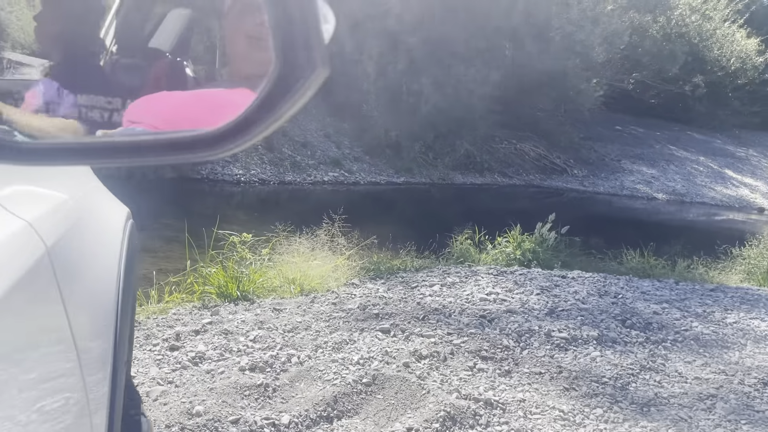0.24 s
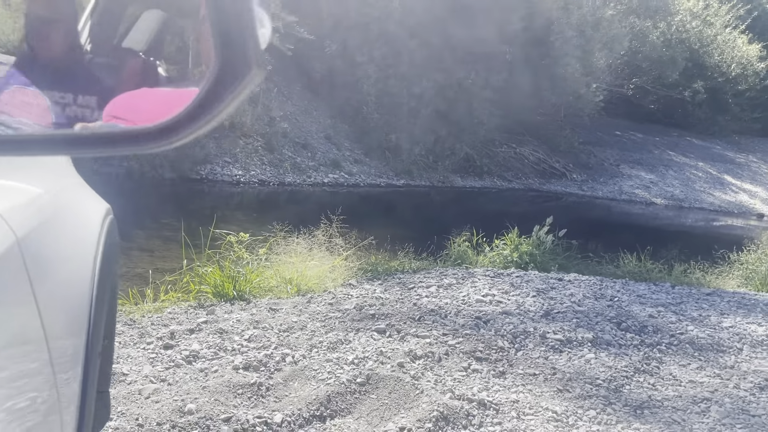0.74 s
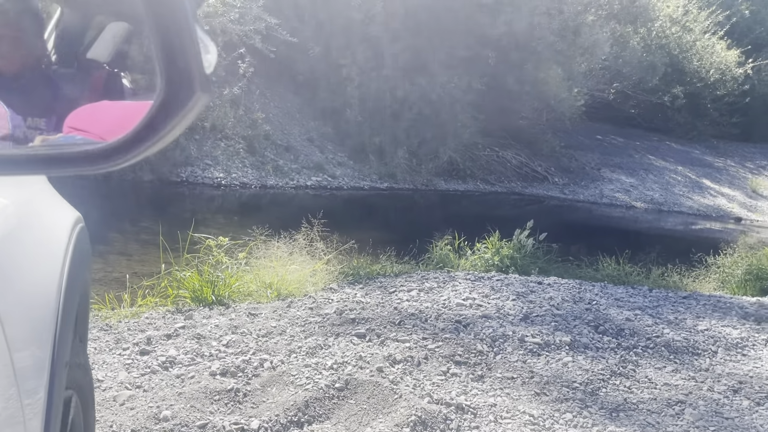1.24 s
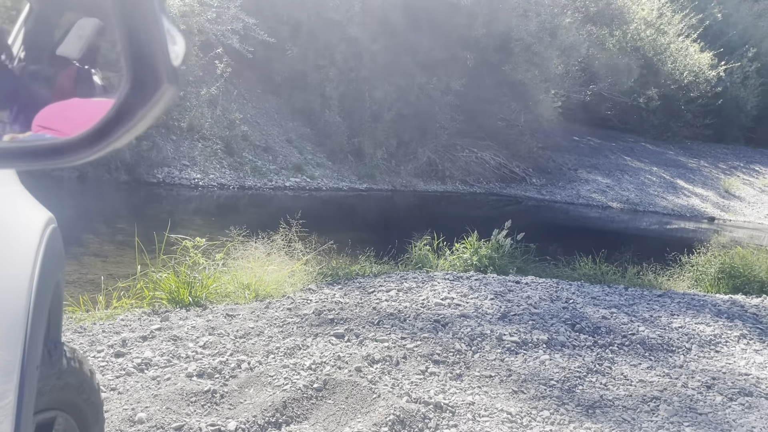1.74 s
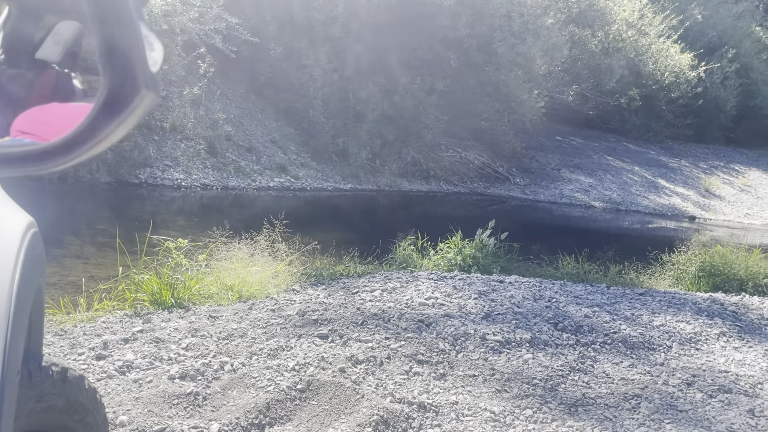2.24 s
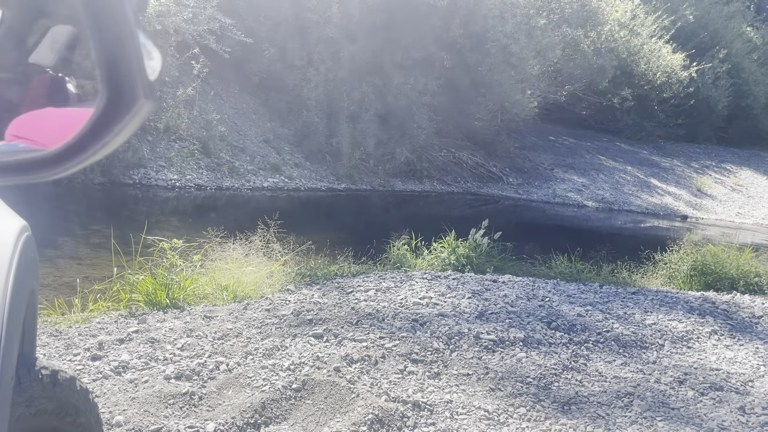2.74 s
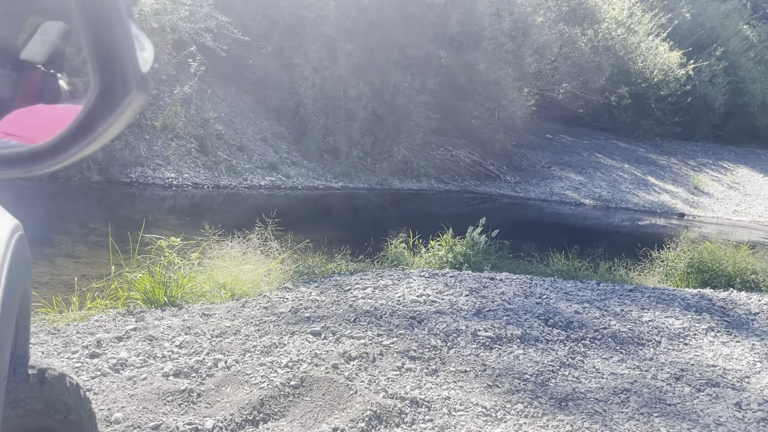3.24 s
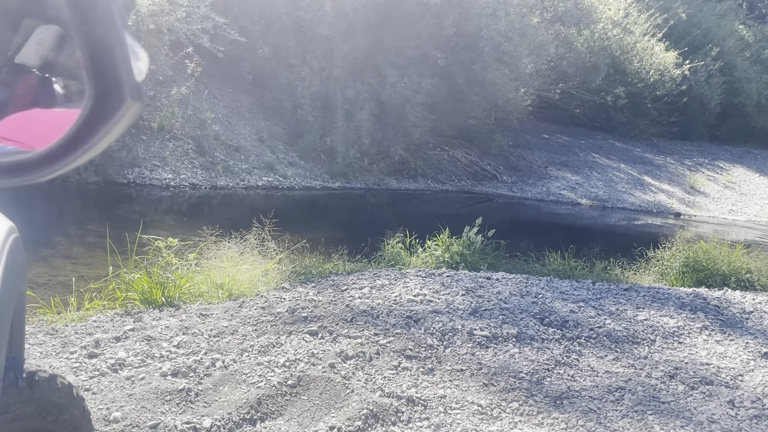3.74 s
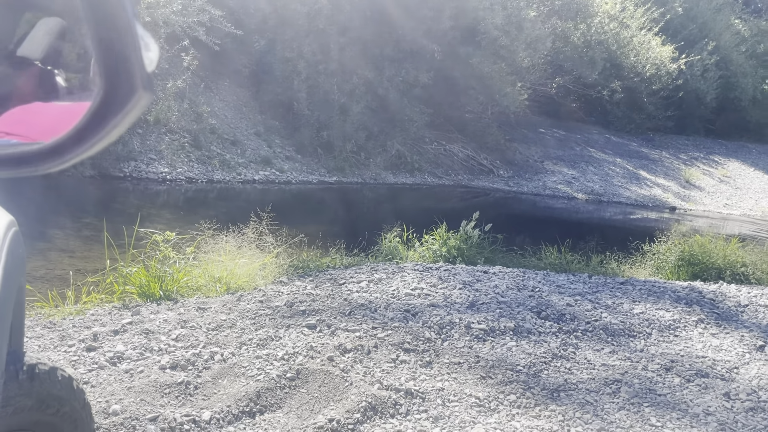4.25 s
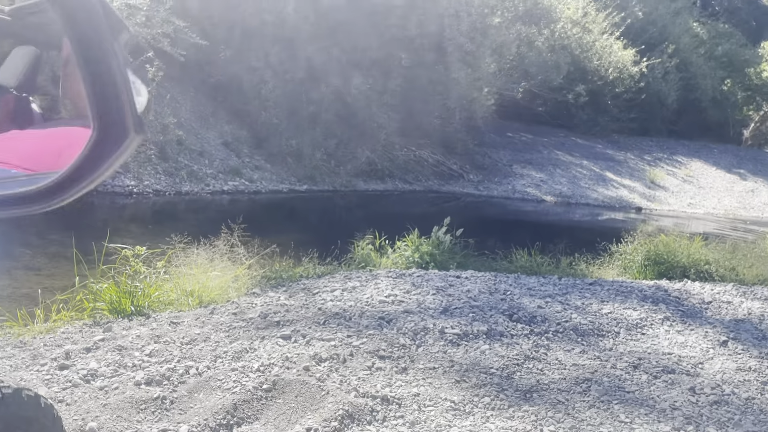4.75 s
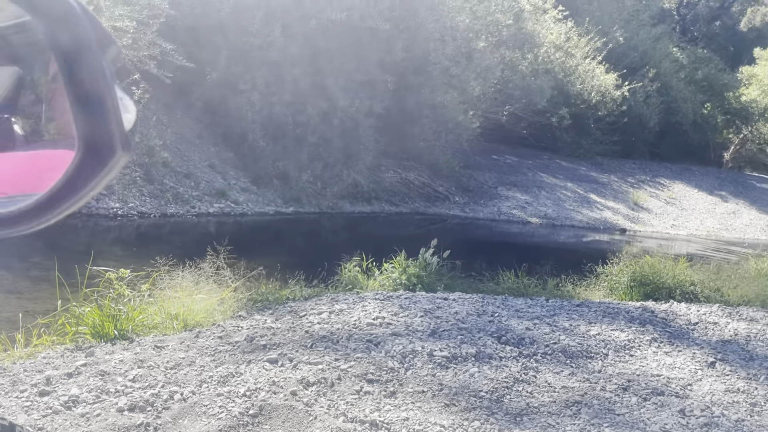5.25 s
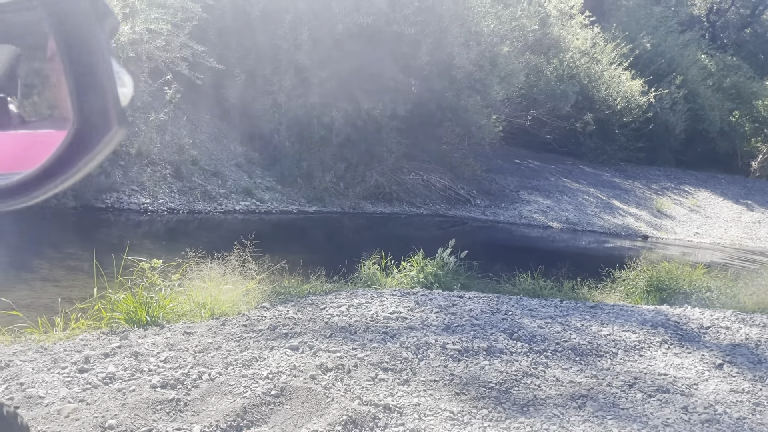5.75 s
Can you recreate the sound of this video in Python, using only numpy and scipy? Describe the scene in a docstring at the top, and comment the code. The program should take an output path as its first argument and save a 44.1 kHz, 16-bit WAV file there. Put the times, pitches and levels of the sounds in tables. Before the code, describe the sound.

A vehicle creeps over a riverside gravel bank. Strong crunch and popping stones open, with a brief piercing squeal; then uneven grinding, clacking pebbles, gritty spitting and soft low thumps. Around three seconds it calms to a low engine hum and sparse ticks. The engine lifts, dips, then surges with a fresh burst of gravel. Close stereo, dry outdoor sound with no echo.

```python
"""Gravel grinds and pops under tyres and a brake squeals over a low engine, close by, at a car's side window.
The car creeps over a bank of loose river gravel: random clicks through colour filters make the stones,
rumbling noise makes the body on the bumps, and decaying rings make the stones that pop.
The engine, harmonics of its firing rate, swells twice; on the second push the tyres churn the gravel.
Two microphone ports hear each sound out of step and at unequal level."""
import sys
import numpy as np
from scipy import signal
from scipy.fft import rfft, irfft
from scipy.io import wavfile
from scipy.ndimage import uniform_filter1d

SR = 44100
rng = np.random.default_rng(int(sys.argv[2]) if len(sys.argv) > 2 else 0)


def digitize_waveform(pressure):
    """Quantize a signal to 16-bit integers and store it at the path in sys.argv[1].

    Rows of a 2-D input are taken as channels; values are limited to [-1, 1].
    """
    field = np.atleast_2d(pressure).T
    bounded = np.clip(field, -1, 1)
    quanta = np.round(bounded * 32767).astype(np.int16)
    wavfile.write(sys.argv[1], SR, quanta)


N = 264600
TIME = np.arange(N) / SR  # s
HZ = np.fft.rfftfreq(N, 1 / SR)

# In every table, levels are relative: each source adds its own trim.
# resonances of exhaust pipe and body panels [f/Hz, level/dB]
EXHAUST_RESONANCE = [(33, -44), (46, -9), (62, -1.5), (77, -1.5), (92, -10), (110, -14.5), (142, -4),
                     (165, -12), (190, -15), (240, -13.5), (275, -20), (305, -17.5), (335, -26), (366, -12),
                     (410, -22), (470, -19), (540, -32), (600, -23), (900, -38)]
# strength of the engine's harmonics [multiple of the firing rate, level/dB]
HARMONICS = [(1, 0.5), (2, 1), (3, -2.5), (4, 0), (5, 1), (6, -4.5), (7, -5), (8, -5.5), (9, 2.5), (10, 2),
             (11, -4.5), (12, -5), (13, -1), (14, -3), (15, 1.5), (16, -17), (17, -4), (18, 4)]
# engine speed: a small lift from idle, then two pushes on the throttle [t/s, firing rate/Hz]
ENGINE_SPEED = [(0, 38.2), (.7, 32.5), (2.55, 31.4), (2.76, 35), (2.95, 37.8), (3.2, 35.8), (3.45, 34.7),
                (3.61, 32.9), (3.82, 33.3), (4.11, 36.4), (4.3, 43.9), (4.43, 46.8), (4.6, 44.8),
                (4.84, 40.6), (5.0, 38.6), (5.12, 43), (5.33, 59), (5.48, 64.3), (5.63, 59.5), (5.84, 47.8),
                (6, 42.7)]
# engine level before the rise with speed [t/s, level/dB]
IDLE_LEVEL = [(0, -39), (.5, -46.5), (2.5, -40.5), (3, -39), (4.1, -37.5), (4.8, -38.5), (5.5, -36),
              (5.8, -37), (6, -40.5)]
# colour of the air rushing through the radiator fan [f/Hz, level/dB]
FAN_COLOUR = [(80, -14), (300, -10), (480, -19), (750, 8), (1000, -15.5), (1350, 5), (1900, -6), (2700, -3),
              (4000, -10.5), (6000, -48), (12000, -31)]
# colour of the body's rumble [f/Hz, level/dB]
RUMBLE_COLOUR = [(15, -48), (28, -12), (42, 1.5), (60, 1.5), (85, -1.5), (130, -6.5), (190, -16.5),
                 (300, -24.5), (500, -28.5), (1200, -66)]
# steady rumble of the rolling wheels [t/s, level/dB]
ROLLING = [(0, -40), (1.2, -37.5), (1.8, -39), (2.9, -34.5), (3.5, -43), (4.3, -36.5), (4.75, -46),
           (5.5, -35.5), (5.85, -41.5)]
# a wheel drops off a stone and jolts the body [t/s, level/dB]
BUMPS = [(.53, -32.5), (.77, -35), (1.08, -32), (1.27, -32.5), (1.47, -31), (1.54, -26), (2.18, -32),
         (2.354, -24), (2.76, -31.5), (3.75, -32), (3.83, -34), (3.92, -30.5), (4.03, -42), (4.19, -34),
         (4.39, -36.5), (5.99, -44)]
# how hard the tyres work the gravel [t/s, level/dB]
TYRE_EFFORT = [(0, -38), (.17, -35), (.5, -44.5), (.77, -43.5), (.95, -46), (1.17, -43.5), (1.55, -43.5),
               (1.75, -47), (2.12, -44.5), (2.32, -47), (2.38, -54.5), (2.65, -51.5), (3.38, -49.5),
               (3.8, -53.5), (4.42, -48.5), (5.13, -51), (5.27, -41), (5.43, -36.5), (5.65, -41.5),
               (6, -43)]
# the gravel gives way under a tyre [t/s, rise and fall time/s, change/dB before each source's share]
SLIPS = [(0.523, 0.14, 7.5), (1.523, 0.027, -2), (1.668, 0.038, 6.5), (1.828, 0.035, 7.5),
         (1.929, 0.024, 10), (2.138, 0.019, 9.5), (2.32, 0.017, 10), (4.39, 0.1, 7), (5.26, 0.037, 10.5),
         (5.448, 0.047, 5)]
# the front wheel steers and its tread scrubs sideways [start t/s, end t/s, ease in/s, ease out/s]
STEERING_SPAN = (0.53, 2.58, 0.52, 0.23)
# colours of the grinding, the deep churning, the pebble patter and the fine grit [f/Hz, level/dB]
GRIND_COLOUR = [(80, -34.5), (170, -3.5), (330, 5), (520, -3), (620, -5), (760, 3.5), (880, 0.5),
                (1020, -0.5), (1180, -5), (1400, -6.5), (1700, -13), (2300, -11.5), (4000, -29),
                (9000, -39)]
CHURN_COLOUR = [(70, -28), (160, 2), (330, -1.5), (480, 1), (700, -15), (1200, -12.5), (1800, -22),
                (2400, -26), (5000, -37)]
PATTER_COLOUR = [(700, 4), (1700, -10.5), (2800, 5.5), (4600, 2), (6000, -2), (7000, 1.5), (8200, -3),
                 (10000, 0), (12000, -7), (14000, -25), (16000, -13.5)]
GRIT_COLOUR = [(2000, -56), (4000, 11), (6500, 0), (8300, 7.5), (10500, 4), (12000, -3), (13800, -3),
               (16000, -24)]
# pebbles clack on each other [t/s, peak level/dB, f/Hz before brightening]
CLACKS = [(0.04, -35.5, 4650), (0.051, -43, 4500), (0.071, -48, 2600), (0.199, -44, 2600),
          (0.216, -43, 2200), (0.322, -40, 2170), (0.335, -50, 3500), (0.508, -42, 8900),
          (0.7248, -40, 4000), (0.739, -42, 7000), (0.78, -30, 5900), (1.0688, -46, 4500),
          (1.128, -45, 4300), (1.152, -43, 4800), (1.1634, -38, 5660), (1.169, -42, 5800),
          (1.187, -36, 4200), (1.2144, -39, 4540), (1.35, -35.5, 4600), (1.401, -39, 4050),
          (1.531, -33, 5500), (1.545, -47, 4400), (1.617, -29.5, 7000), (1.626, -43, 3970),
          (1.974, -46, 4550), (2.085, -40, 6500), (2.358, -37.5, 5700), (2.445, -48, 6000),
          (2.7497, -51, 5800), (3.312, -45, 3990), (3.4335, -42.5, 5000), (3.891, -44.5, 5800),
          (4.037, -38.5, 4560), (4.379, -39.5, 6400), (4.4545, -41, 6600), (5.313, -39.5, 6940),
          (5.4967, -32.5, 3700), (5.54, -39, 3300), (5.568, -35.5, 3500), (5.6156, -37.5, 10000),
          (5.624, -41, 9500)]
# stones pop from under the tread [t/s, peak level/dB, ring f/Hz, hardness of the blow/dB per octave]
POPS = [(0.072, -23.5, 800, 3), (0.106, -27, 960, 4), (0.135, -25, 727, 0), (0.166, -27, 850, 8),
        (0.198, -33, 930, 2), (0.253, -31, 1000, 3), (0.321, -26, 730, 3), (0.334, -25, 650, -4),
        (0.357, -33, 705, 3), (0.404, -27, 840, -1), (0.511, -28.5, 564, 3), (0.725, -23, 750, -7),
        (0.781, -25, 925, 0), (1.038, -30.5, 910, -6), (1.111, -30, 755, -11), (1.152, -29.5, 810, -7),
        (1.19, -25, 835, -8), (1.333, -28, 860, -5), (1.35, -25, 740, -5), (1.441, -30, 790, -6),
        (1.453, -29, 930, -6), (1.564, -32, 762, -1), (1.815, -26.5, 920, -1), (1.972, -27, 880, -5),
        (2.019, -36, 800, -3), (2.121, -31, 600, 0), (2.282, -31, 570, -2), (2.308, -36, 556, -2),
        (2.608, -34.5, 685, 2), (2.75, -21, 870, 4.5), (3.161, -36, 656, -8), (4.378, -30.5, 725, -5),
        (5.207, -31, 710, -7), (5.33, -33, 830, -3), (5.392, -31, 681, -2), (5.445, -21.5, 780, -2),
        (5.66, -31, 870, 2)]
# modes of a popping stone [multiple of ring f, level/dB, time to fall 60 dB/s]
POP_MODES = [(.45, 4, 0.035), (.85, 5.5, 0.023), (1, 17.5, 0.023), (1.15, 15.5, 0.0079), (1.85, 11.5, 0.01),
             (2.1, 9.5, 0.014), (2.5, 14, 0.0078)]
# uneven swells of the brake squeal [peak t/s, rise/s, fall/s, level/dB]
SQUEAL_SWELLS = [(0.196, 0.063, 0.012, -40.5), (0.299, 0.041, 0.075, -36), (0.38, 0.026, 0.013, -44.5),
                 (.443, 0.022, 0.034, -45.5), (.507, 0.0096, 0.045, -51.5)]
# thin brake squeaks [start t/s, length/s, first f/Hz, last f/Hz, level/dB]
SQUEAKS = [(4.91, 0.13, 14400, 11300, -56.5), (5.763, 0.076, 4690, 4670, -49.5),
           (5.915, 0.085, 14200, 13700, -55)]
# short rasps: a stone skids over its neighbours, or bright grit sprays in a brief hissing surge [start t/s,
# length/s, level/dB, centre f/Hz]
SCRAPES = [(0.162, 0.092, -39.5, 1690), (0.397, 0.016, -37, 1690), (1.102, 0.12, -57, 4900),
           (1.498, 0.06, -53, 4300), (1.82, 0.019, -49, 1630), (1.911, 0.017, -45.5, 2020),
           (2.04, 0.15, -56, 4200), (2.119, 0.035, -41, 1080), (2.278, 0.048, -45, 714),
           (2.32, 0.026, -48, 1910), (5.409, 0.076, -47, 4140)]
# phase by which the left microphone port leads [f/Hz, lead/rad]
PORT_LEAD = [(0, 0), (60, .1), (140, .45), (300, .4), (1000, 1), (2000, 2), (3400, 5.7), (5200, 6.7),
             (6200, 5.6), (8300, 3.14), (11700, 0), (15000, -3.14)]
# likeness of scattered sound at the two ports [f/Hz, likeness 0-1, clipped at 1]
PORT_LIKENESS = [(50, 0.84), (130, 1), (300, 0.77), (1000, 0.51), (2000, 0.93), (2900, 0.06), (3900, 0.74),
                 (6500, 0.9), (8300, 1), (10000, 0.62), (14000, 1)]
# balance of the ports [f/Hz, left minus right level/dB]
PORT_BALANCE = [(60, 0.3), (200, -1.5), (500, 0.5), (1300, 2.5), (3000, 4), (5000, 5), (6800, 0.5),
                (14000, -0.5)]

IDLE_HZ, FLYWHEEL_S, LOUDER_DB_PER_OCTAVE = 34.3, 0.077, 10
BUMP_RISE_S, BUMP_FALL_S = 0.021, 0.068
USUAL_EFFORT_DB = -45
SETTLE_S = 0.21  # thrown pebbles land this long after the push that threw them
SQUEAL_HZ = 6981
SQUEAK_FLUTTER, CHATTER = .5, .1  # depths, 0-1
EDGE_HZ = 14550  # upper edge of the recorder's band
LEFT_RIGHT = np.array([[.5], [-.5]])  # splits a left-minus-right difference between the ports


def gain_of(db):
    """Turns decibels into an amplitude factor."""
    return 10 ** (np.asarray(db) / 20)


def unit_rms(x):
    """Scales a signal to rms 1."""
    return x / np.sqrt(np.mean(x ** 2) + 1e-20)


def over_time(rows):
    """Reads a time table at every sample."""
    return np.interp(TIME, *np.transpose(rows))


def over_frequency(points, hz):
    """Reads a spectrum table on a log-frequency axis."""
    f, value = np.transpose(points)
    return np.interp(np.log(hz + 1), np.log(f + 1), value)


def add(mix, s, sound):
    """Lays a sound into the mix from time s on."""
    part = mix[max(round(s * SR), 0):][:len(sound)]
    part += sound[:len(part)]


def drift(hz):
    """Slow random wandering of rms 1 that weakens above the given rate."""
    coarse = TIME[::100]
    f = np.fft.rfftfreq(len(coarse), coarse[1])
    spectrum = rfft(rng.standard_normal(len(coarse))) / (1 + (f / hz) ** 2) ** 2
    slow = irfft(spectrum, len(coarse))
    return np.interp(TIME, coarse, unit_rms(slow))


def swell(s, rise_s, fall_s, rise_shape=2, fall_shape=1.5):
    """A rounded rise to 1 at time s, then a fall; a smaller shape gives a longer foot."""
    away = abs(TIME - s)
    rise = (away / rise_s) ** rise_shape
    fall = (away / fall_s) ** fall_shape
    return np.exp(-np.where(TIME < s, rise, fall))


def coloured(x, points):
    """A causal minimum-phase filter: each click keeps a sharp front and a short tail."""
    hz = abs(np.fft.fftfreq(N, 1 / SR))
    log_gain = np.log(gain_of(over_frequency(points, hz)))
    response = np.exp(np.conj(signal.hilbert(log_gain)))
    return irfft(rfft(x) * response[:len(HZ)], N)


def band_noise(n, hz, octaves):
    """A stretch of noise around one pitch, a bell on the octave axis."""
    f = np.fft.rfftfreq(n, 1 / SR) + 1
    bell = np.exp(-.5 * (np.log2(f / hz) / octaves) ** 2)
    return unit_rms(irfft(rfft(rng.standard_normal(n)) * bell, n))


def ports(shared, apart=None):
    """Sound reaches the two microphone ports out of step; any scattered part differs between them."""
    z = rfft(shared) * np.exp(1j * over_frequency(PORT_LEAD, HZ) * np.array([[0], [-1]]))
    if apart is not None:
        alike = np.clip(over_frequency(PORT_LIKENESS, HZ), 0, 1)
        z = np.sqrt(alike) * z + np.sqrt(1 - alike) * rfft(apart)
    return irfft(z * gain_of(over_frequency(PORT_BALANCE, HZ) * LEFT_RIGHT), N)


def scattered_noise(colour):
    """Coloured noise at both ports: one shared stream and one apart for each port."""
    noise = coloured(rng.standard_normal((3, N)), colour)
    return unit_rms(ports(noise[0], noise[1:]))


def stones(per_s, spread_db, largest, wash, colour):
    """Countless small contacts of unequal size over a wash of tiny ones."""
    shape = (3, N)  # one shared stream and one apart for each port
    size = gain_of(spread_db * np.minimum(rng.exponential(1, shape), largest))
    struck = rng.random(shape) < per_s / SR
    clicks = size * rng.choice([-1, 1], shape) * struck
    sound = coloured(unit_rms(clicks) + wash * rng.standard_normal(shape), colour)
    return unit_rms(ports(sound[0], sound[1:]))


def knocking(per_s, spread_db, low_hz, high_hz, cycles, count=24):
    """Stones of many sizes knock together at random, each ringing for a few cycles."""
    out, t = np.zeros(N), TIME[:SR // 25]
    for hz in np.geomspace(low_hz, high_hz, count):
        size = gain_of(spread_db * np.minimum(rng.exponential(1, N), 2))
        blows = size * (rng.random(N) < per_s / count / SR)
        ring = np.sin(2 * np.pi * hz * t) * np.exp(-t * hz / cycles)
        out += signal.oaconvolve(blows, ring)[:N]
    return unit_rms(ports(out))


def firing_hz():
    """Engine speed, each change smoothed by the flywheel."""
    return uniform_filter1d(over_time(ENGINE_SPEED), size=int(FLYWHEEL_S * SR), mode="nearest")


def revs():
    """Octaves of engine speed above idle."""
    return np.log2(firing_hz() / IDLE_HZ)


def load_db():
    """The engine gets louder as it speeds up."""
    return over_time(IDLE_LEVEL) + LOUDER_DB_PER_OCTAVE * revs()


def effort_db():
    """How far the tyres work above their usual effort."""
    return over_time(TYRE_EFFORT) - USUAL_EFFORT_DB


def slips_db():
    """Brief changes of level, nearly all surges, where the gravel gives way."""
    return sum(db * swell(s, width_s, width_s) for s, width_s, db in SLIPS)


def steering():
    """1 while the front wheel turns, 0 while it is held, eased between."""
    start, end, ease_in, ease_out = STEERING_SPAN
    return np.clip(np.minimum((TIME - start) / ease_in, (end - TIME) / ease_out), 0, 1)


def engine(rough=0.09, rough_per_order=.014, waver=0.0015, shaft_db=-22, uneven_db=.9):
    """Firing harmonics slide through the exhaust's resonances; uneven cylinders add half orders."""
    hz = firing_hz() * (1 + waver * drift(10.36))
    turn = 2 * np.pi * np.cumsum(hz) / SR
    out = np.zeros(N)
    for k, db in HARMONICS:
        k = round(k)
        roughness = unit_rms(1 + (rough + rough_per_order * k) * drift(12.3))
        line = np.cos(k * turn + 2 * np.pi * rng.random()) * roughness
        half = gain_of(shaft_db) * np.cos((k + .5) * turn + 2 * np.pi * rng.random())
        # the higher harmonics slowly come and go
        sway = np.sin(2 * np.pi * (rng.uniform(0.492, 2.035) * TIME + rng.random()))
        sway_db = uneven_db * np.log(k) * sway
        out += gain_of(db + sway_db + over_frequency(EXHAUST_RESONANCE, k * hz)) * (line + half)
    return ports(out * np.sqrt(2) * gain_of(load_db()))


def fan(level_db=-19):
    """Air noise: a smooth rush from under the bonnet that rises with the throttle."""
    return scattered_noise(FAN_COLOUR) * gain_of(load_db() + level_db)


def rumble(level_db=-1.5, steadiness=1.0):
    """Low noise: the tyres and body boom as the wheels climb over the stones."""
    boom = scattered_noise(RUMBLE_COLOUR)
    # flatten the chance swells of the noise, so that the bumps set the level
    power = abs(uniform_filter1d(boom[0] ** 2, size=4000)) + 1e-6
    steady = unit_rms(boom / power ** (steadiness / 2))
    jolts = sum((gain_of(db) * swell(s, BUMP_RISE_S, BUMP_FALL_S)) ** 2 for s, db in BUMPS)
    return steady * gain_of(level_db) * np.sqrt(gain_of(over_time(ROLLING)) ** 2 + jolts)


def grinding(level_db=-44.5, clump_db=1.44, slip_share=0.13):
    """Stones shift in clumps under the tread, muffled by the rubber; the middling ones knock."""
    knocks = gain_of(-4) * knocking(per_s=260, spread_db=2.5, low_hz=480, high_hz=1200, cycles=3)
    crunch = stones(per_s=1300, spread_db=2.5, largest=2.83, wash=0.51, colour=GRIND_COLOUR) + knocks
    return crunch * gain_of(level_db + effort_db() + slip_share * slips_db() + clump_db * drift(22))


def churning(level_db=-48, follow=0.57, slip_share=1.13, steering_db=1.5):
    """Under load, and as it steers, the tread shoves the deeper, larger stones."""
    shove = stones(per_s=500, spread_db=1.5, largest=6.6, wash=0.39, colour=CHURN_COLOUR)
    worked_db = follow * effort_db() + slip_share * slips_db() + steering_db * steering()
    return shove * gain_of(level_db + worked_db)


def patter(level_db=-55.0, follow=0.71, steering_db=2, throttle_db=4.0, clump_db=1.0):
    """Loose pebbles tick and clink beside the tyres, more when the wheels steer or have just pulled."""
    clinks = gain_of(-7) * knocking(per_s=350, spread_db=3, low_hz=3100, high_hz=6200, cycles=14)
    ticks = stones(per_s=2400, spread_db=-2.5, largest=6.3, wash=0.81, colour=PATTER_COLOUR) + clinks
    landing = np.interp(TIME - SETTLE_S, TIME, revs())
    thrown_db = follow * effort_db() + steering_db * steering() + throttle_db * landing
    return ticks * gain_of(level_db + thrown_db + clump_db * drift(62))


def grit(level_db=-65, follow=1.0, steering_db=11, throttle_db=4, clump_db=2):
    """Small bright chips spit from the tread in spurts, helped most by the steering wheel's scrub."""
    ticks = stones(per_s=1400, spread_db=11, largest=3.8, wash=0.95, colour=GRIT_COLOUR)
    thrown_db = follow * effort_db() + steering_db * steering() + throttle_db * revs()
    return ticks * gain_of(level_db + thrown_db + clump_db * drift(60))


def clacks(level_db=6, decay_s=0.00045, rattle=0.077, rattle_s=0.0048, bright=1.28, rise_s=0.0004):
    """Bare pebbles strike: a bright crack of noise and a brief rattle."""
    out, t = np.zeros(N), TIME[:SR // 20]
    shape = (np.exp(-t / decay_s) + rattle * np.exp(-t / rattle_s)) * (1 - np.exp(-t / rise_s))
    for s, db, hz in CLACKS:
        crack = band_noise(len(t), bright * hz, 0.61) * shape
        add(out, s, gain_of(db + level_db) * crack / abs(crack).max())
    return ports(out)


def pops(level_db=1.8, scatter=0.04, scatter_s=0.006, rise_s=.00025):
    """A large stone snaps free with a woody knock and a scrape; harder blows wake the upper modes."""
    out, t = np.zeros(N), TIME[:SR // 20]
    for s, db, hz, hard_db in POPS:
        ring = np.zeros(len(t))
        for k, mode_db, t60 in POP_MODES:
            mode = np.sin(2 * np.pi * hz * k * rng.uniform(1.0, 1.04) * t)
            ring += gain_of(mode_db + hard_db * np.log2(k) - 60 * t / t60) * mode
        # one clean blow, then the scrape of its neighbours
        blows = scatter * rng.standard_normal(len(t)) * np.exp(-t / scatter_s)
        blows[0] = 1
        knock = signal.fftconvolve(blows, ring * (1 - np.exp(-t / rise_s)))
        add(out, s, gain_of(db + level_db) * knock / abs(knock).max())
    rubber = signal.butter(4, 2450, fs=SR, output="sos")  # the tyre muffles the treble
    return ports(signal.sosfilt(rubber, out))


def squeal(level_db=1, octave_db=-17, waver_hz=10):
    """The brake pad sets the disc singing on one high mode, with a slight chatter."""
    turn = 2 * np.pi * np.cumsum(SQUEAL_HZ + waver_hz * drift(40)) / SR
    swing = sum(gain_of(db + level_db) * swell(s, rise_s, fall_s, rise_shape=1.46, fall_shape=1.55)
                for s, rise_s, fall_s, db in SQUEAL_SWELLS)
    swing = swing * (1 + CHATTER * drift(60))
    octave = gain_of(octave_db) * swing / swing.max()  # the overtone grows with the swing of the disc
    return np.sqrt(2) * swing * (np.sin(turn) + octave * np.sin(2 * turn))


def squeaks():
    """Later the brake only squeaks faintly: thin fluttering tones that glide down."""
    out = np.zeros(N)
    for s, length, first_hz, last_hz, db in SQUEAKS:
        n = int(length * SR)
        glide = np.linspace(1, 0, n) ** 1.5  # quick at first, then settling
        hz = (last_hz + (first_hz - last_hz) * glide) * (1 + 0.0072 * drift(600)[:n])
        shape = signal.windows.tukey(n, .7) * unit_rms(1 + SQUEAK_FLUTTER * drift(200)[:n])
        add(out, s, gain_of(db) * shape * np.sin(2 * np.pi * np.cumsum(hz) / SR))
    return out


def brake():
    """Squeal and squeaks reach the ports from the same brake."""
    return ports(squeal() + squeaks())


def scrapes(octaves=0.48):
    """Short rasps of stone on stone and brief hissing sprays of grit, each a band of noise."""
    out = np.zeros(N)
    for s, length, db, hz in SCRAPES:
        n = int(length * SR)
        add(out, s, gain_of(db) * band_noise(n, hz, octaves) * signal.windows.tukey(n, .6))
    return ports(out)


def scene(lean_db=0.5):
    """Everything is close and in the open air; the crunch leans a little to the left."""
    gravel = (grinding() + churning()) * gain_of(lean_db * LEFT_RIGHT)
    loose_stones = patter() + grit() + clacks() + pops() + scrapes()
    return engine() + fan() + rumble() + gravel + loose_stones + brake()


def record(dry):
    """The recorder's band limit: a steep low-pass."""
    edge = signal.firwin(511, EDGE_HZ, window=("kaiser", 9), fs=SR)
    return signal.oaconvolve(dry, edge[None], "same")


dry = scene()
out = record(dry)
digitize_waveform(out)
```